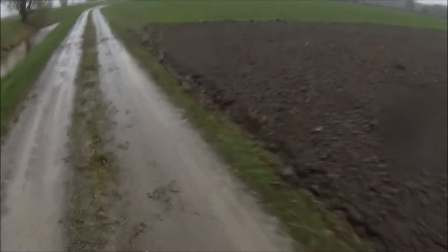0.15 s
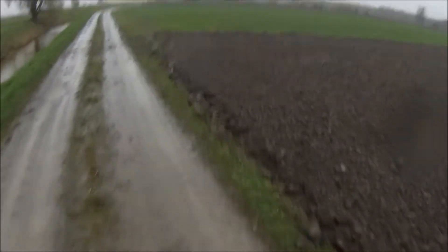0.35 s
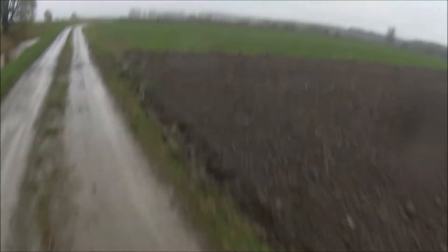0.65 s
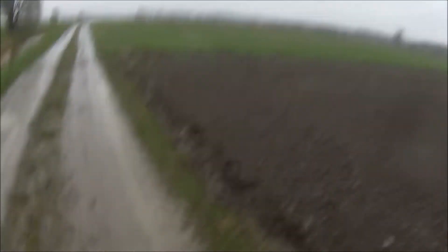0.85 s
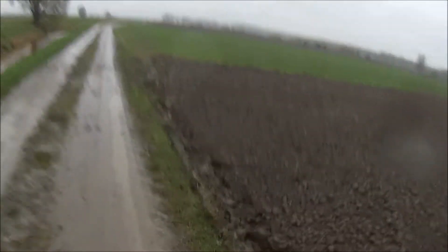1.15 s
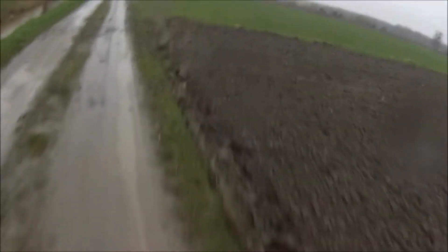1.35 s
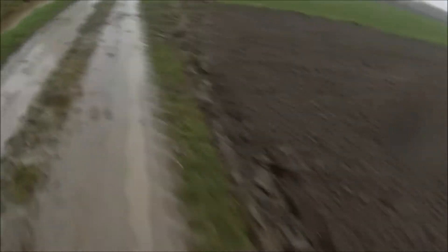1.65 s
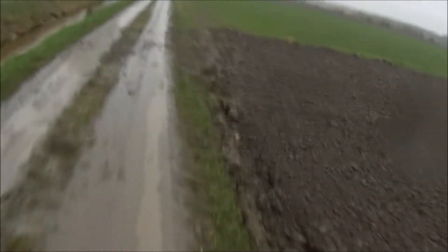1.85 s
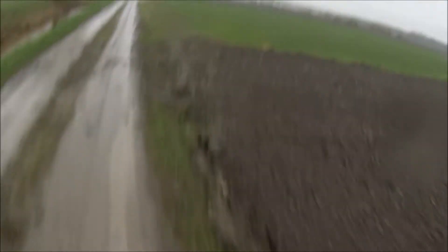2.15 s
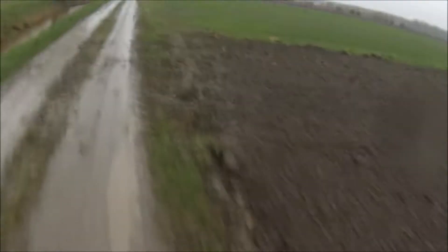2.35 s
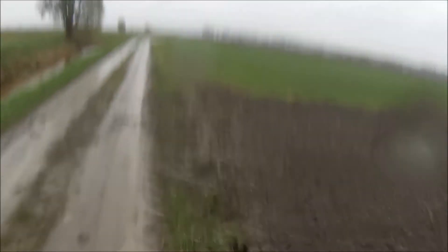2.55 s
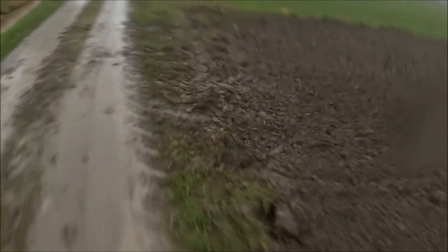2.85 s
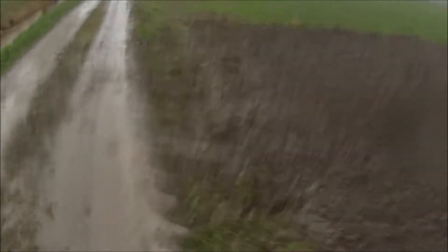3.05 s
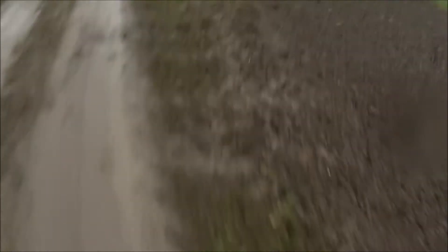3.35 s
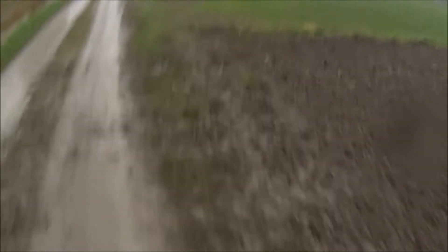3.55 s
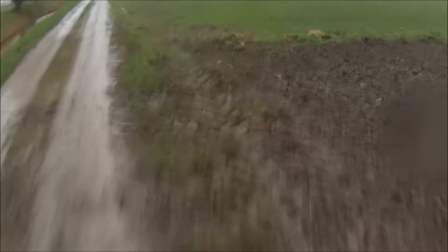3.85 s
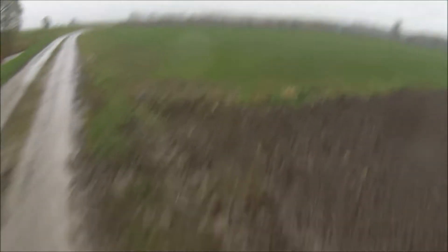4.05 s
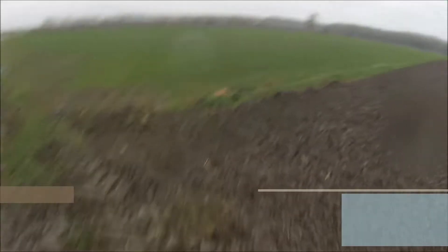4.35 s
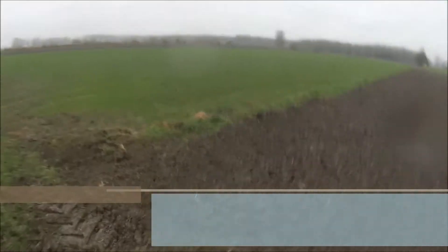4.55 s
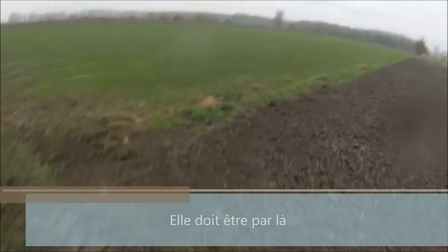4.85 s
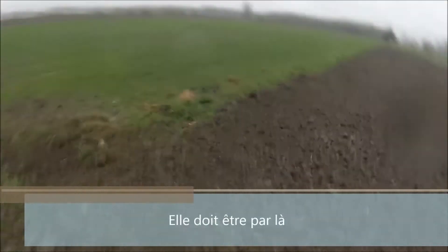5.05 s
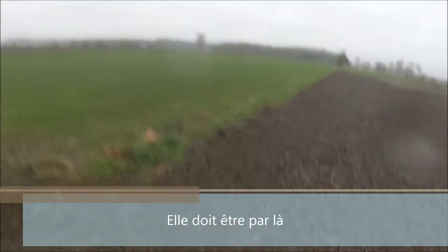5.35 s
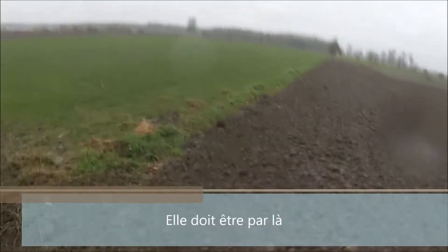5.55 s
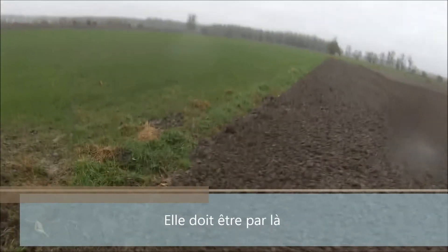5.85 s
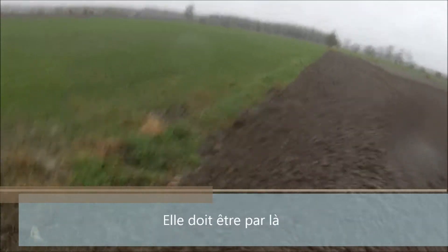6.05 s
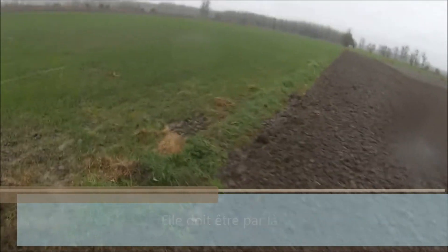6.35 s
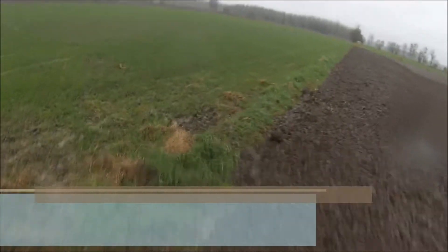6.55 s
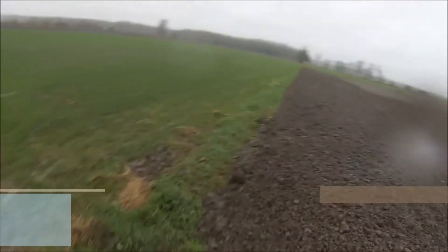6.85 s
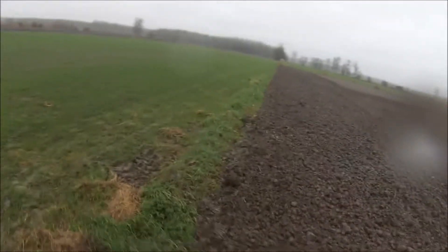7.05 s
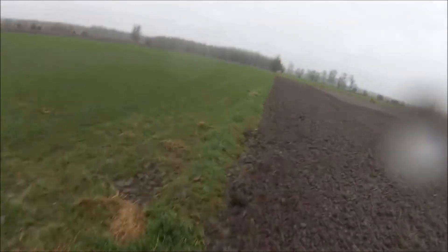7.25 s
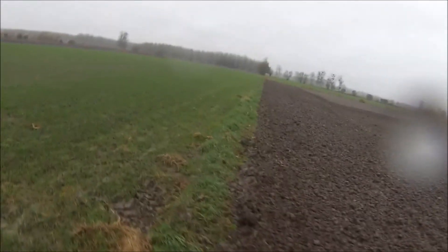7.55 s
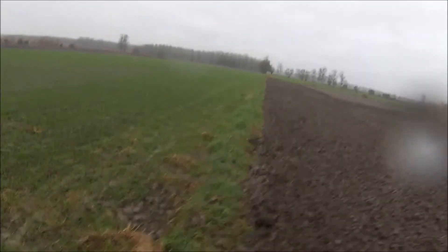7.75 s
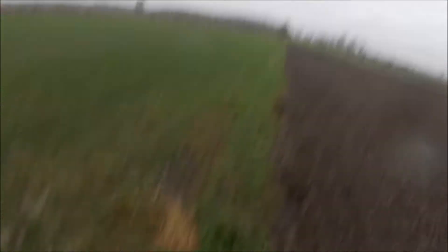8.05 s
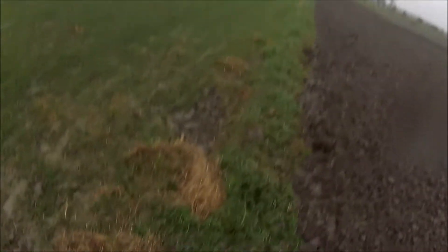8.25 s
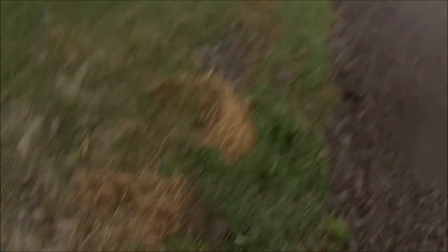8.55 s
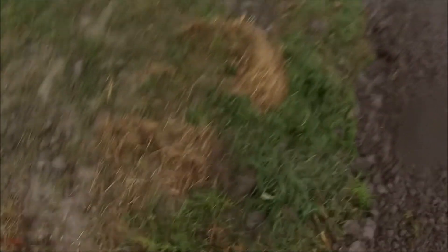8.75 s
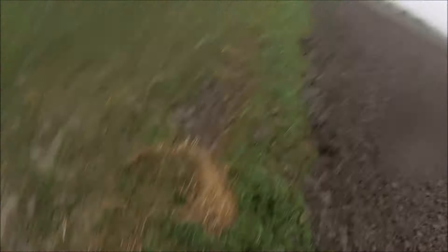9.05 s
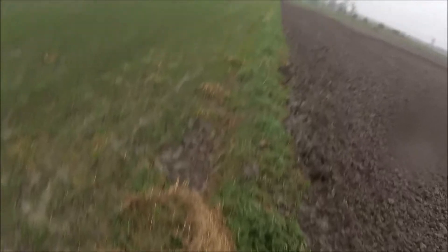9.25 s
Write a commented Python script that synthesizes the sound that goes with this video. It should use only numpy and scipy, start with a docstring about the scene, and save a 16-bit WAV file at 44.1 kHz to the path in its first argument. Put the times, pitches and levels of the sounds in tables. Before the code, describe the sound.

Close raindrops tap on plastic as someone walks through wet mud with deep thuds, then slows and halts.

```python
"""An even hiss of rain on open fields comes first, and at once footsteps on a muddy track, very close.
Each footfall jolts the carried microphone with a deep thud and squirts water; clothing and wet grass swish.
Raindrops tick right on the microphone's plastic housing and make it ring briefly; finer drops patter.
The walker slows down and stops at the edge of a field while the rain goes on."""
import sys
import numpy as np
from scipy import signal
from scipy.fft import rfft, irfft
from scipy.io import wavfile

SR = 44100
rng = np.random.default_rng(int(sys.argv[2]) if len(sys.argv) > 2 else 0)


def to_wav(s):
    """Save 16-bit WAV."""
    ch = np.atleast_2d(s).T  # columns
    pcm = np.round(np.clip(ch, -1, 1) * 32767)  # PCM
    wavfile.write(sys.argv[1], SR, pcm.astype(np.int16))


N = 415422
TIME = np.arange(N) / SR

# Noise colours. Each row: frequency in Hz, relative spectral level in dB.
FAR_RAIN_COLOUR = [(100, 3.5), (250, 5.5), (500, 3), (1000, 0), (2000, -7), (3200, -6.5), (5500, -10),
                   (8000, -14), (12500, -17.5), (15000, -24.5)]  # rain out on the fields
RUB_COLOUR = [(90, 2), (170, 9.5), (320, 7), (600, -1.5), (1000, -19.5), (1600, -26.5)]  # cloth and mud
SWISH_COLOUR = [(700, -8.5), (1200, -6), (1750, -1.5), (2200, 0), (2800, -10), (3600, -31), (5000, -33.5)]  # wet grass and squirting water
SPRAY_COLOUR = [(2600, -18.5), (3500, 3.5), (4400, 1), (5700, -3.5), (7000, -13), (9000, -40)]  # flying droplets
SIZZLE_COLOUR = [(5500, 1), (7200, 12), (9500, 6.5), (12000, -1.5), (15000, -24)]  # a sole on wet ground
SWAY_COLOUR = [(14, 0.5), (24, 5), (48, -5), (70, -11.5), (100, -23), (160, -29)]  # the housing rumbling on its mount
# How hard the walker brushes through the wet. Each row: time in seconds, level in dB.
BRUSHING = [(0.0, -66), (0.15, -67), (1.26, -61.5), (1.6, -66), (1.86, -64.5), (2.17, -60.5), (2.46, -56.5),
            (2.86, -63.5), (3.23, -59.5), (3.88, -61.5), (4.83, -64.5), (4.96, -66), (7.37, -68),
            (7.58, -62.5), (8.42, -71.5), (9.13, -68), (9.42, -69)]
# Sway of the carried housing. Each row: time in seconds, level in dB.
SWAY_LEVELS = [(0, -42.5), (2.0, -47.5), (2.7, -41.5), (3.5, -45.5), (5.4, -47.5), (6.3, -50), (7.4, -52),
               (8.1, -47), (9.42, -52)]
# Steps on the track. Each row: time in seconds, jolt strength in dB, jolt pitch in Hz, wetness in dB.
FOOTSTEPS = [(0.075, -5.5, 32.6, -7.5), (0.452, -15, 22, -2), (0.829, -10, 28.7, -3),
             (1.211, -13.5, 23.8, -5), (1.586, -8, 33.7, -1), (1.944, -13.5, 29.6, -5),
             (2.314, -8.5, 29.5, -2), (2.698, -7.5, 29.4, -5), (3.069, -12, 26.8, -2.5),
             (3.426, -20, 29.5, 1.5), (3.804, -12.5, 30.7, -2.5), (4.197, -8.5, 26.7, -7),
             (4.612, -6, 25.7, -5), (5.034, -9.5, 36, -9), (5.458, -21.5, 29.6, -2),
             (5.988, -13.5, 25.4, -5), (6.512, -24.5, 36, -17), (7.028, -22.5, 35.4, -19),
             (7.714, -29, 23.1, -7), (8.204, -35.5, 26, -8)]
# Full drops on the housing. Each row: time in seconds, strength in dB,
# upper main modes over lower ones in dB, hardness in dB (more gives more treble).
HOUSING_DROPS = [(0.0825, -40.5, -2.5, -15), (0.1745, -45.5, -8, -27), (0.6105, -38.0, -6.5, -19),
                 (0.793, -41, -3.5, -11), (0.8224, -51.5, -3, 2), (1.0243, -31, 3, -4),
                 (1.0674, -44.5, -8, -18), (1.1349, -37, 4, -16.5), (1.289, -43.5, -2, -12),
                 (1.3115, -38.5, -1.5, -9), (1.4091, -37.5, -3.5, -26), (1.461, -34.5, -1.5, -39),
                 (1.7906, -49.5, 13, 3.5), (1.8301, -36, -6.5, -30), (2.024, -44, -4, -12),
                 (2.0835, -44, -0.5, -19), (2.1187, -47.5, -3, -8.5), (2.169, -47.5, -4, -21),
                 (2.3123, -41, -5, -25), (2.4683, -39.5, 10, 7.5), (2.5468, -45.5, -2, -11),
                 (2.558, -40.5, -8, -9), (2.6014, -35.0, -6, -29), (2.7684, -59, 14, 13),
                 (2.8224, -41, 5.5, 3.5), (3.158, -28.0, 2.5, -9), (3.2062, -44.5, -14, -14),
                 (3.248, -46.5, -3, -24), (3.33, -43, 6, -8.5), (3.46, -47.5, -6, -5.5),
                 (3.5103, -41, -12, -13), (3.5387, -34, 2, -3), (3.5879, -32, -2, -23),
                 (3.756, -48, -10, -5), (4.028, -39, -2.5, -1.5), (4.094, -44.5, -10, -6),
                 (4.133, -31.5, -7, -27), (4.1982, -36.5, -6, -25), (4.2397, -52, 3, -2),
                 (4.3439, -49.5, -1, -8), (4.3789, -32, 0, -14.5), (4.482, -32, -2, -33),
                 (4.57, -43.5, -8, -8), (4.579, -41.5, 8, -10), (4.6151, -42, -5, -10.5),
                 (4.8656, -30, -3, -7), (5.4055, -31, 7, -5.5), (5.5716, -47, 1, -14),
                 (5.838, -49.5, 12, -5.5), (5.889, -52, 5, -4), (5.9725, -45, 8, -1.5), (6.1, -48, 16, -5),
                 (6.232, -46, 9, -8.5), (6.2824, -45, -4, -7.5), (6.3155, -22.5, 5.5, -10.5),
                 (6.3778, -22.5, -5, -8.5), (6.4854, -50.5, 4, -20), (6.5822, -33.5, 14, -9),
                 (6.6261, -30.5, 4, -11), (6.778, -27.5, 3.5, -10.5), (6.9701, -27, 1, -1),
                 (7.3014, -42.5, 2, -7.5), (7.3988, -47, -5, -10), (7.4132, -32.5, 4.5, -4),
                 (7.523, -36.5, 8, -5.5), (7.5964, -42.5, -5, -15.5), (7.6666, -28.5, 5.5, -1),
                 (7.7348, -38.5, -4.5, -8), (7.9293, -37.5, -10, -42), (8.0158, -41, -2, -9),
                 (8.0899, -44, 4, -6), (8.117, -45.5, 14, -8), (8.6236, -31.5, 2.5, -8.5),
                 (8.8153, -18.5, 4, -9.5), (9.1475, -41.5, 1, -6), (9.175, -28.0, 8.5, -6.5),
                 (9.218, -50.5, -3, -5), (9.298, -51, -2, -2)]
# The housing's two main and three treble ranges. Each row: low edge in Hz, high edge in Hz.
MODE_RANGES = [(1100, 2050), (2000, 3000), (3000, 4800), (4800, 8000), (8000, 15000)]
# How a hard landing wakes the treble ranges. Each row: offset in dB at hardness 0, dB per dB of hardness.
TREBLE_RESPONSE = [(-2, 1.32), (-2.5, 1.17), (-14.5, 1.15)]
# Modes of the plastic housing. Each row: frequency in Hz, bandwidth in Hz, relative level in dB.
DAMPED_MODES = [(1530, 120, -31), (1693, 444, 19), (2150, 890, 4.5), (2637, 380, 11), (3190, 1150, 0),
                (4290, 2440, -1), (5590, 770, 2), (7370, 1010, -3.5), (9140, 2050, 5.5), (12800, 2000, 3.5),
                (14300, 2100, -3)]
RINGING_MODES = [(1867, 18, -5), (2100, 53, -8.5), (2170, 48, -6), (2970, 47, -6), (3130, 31, -12),
                 (4600, 23, -30), (6200, 64, -13.5)]
# Fine rain at the microphone. Each row: time in seconds, drops per second, typical strength in dB.
FINE_RAIN = [(0, 32, -63.5), (1.2, 34, -62.5), (4.6, 34, -56.5), (5.6, 25.2, -62.5), (8.0, 5.6, -60.5),
             (8.4, 3.3, -64.5), (9.42, 6, -49)]

HEEL_DB, HEEL_GROWTH = -23, 1.63  # heel force at a 0 dB jolt, dB per dB of jolt
SQUIRT_DB, SQUIRT_GROWTH = -41, 0.95  # the same for the squirt, which grows more slowly
CUTOFF_HZ = 16000


def from_db(db):
    """Decibels to gain."""
    return 10 ** (np.asarray(db) / 20)


def rms_one(x):
    """Scale to unit rms."""
    return x / np.sqrt(np.mean(x ** 2) + 1e-20)


def in_time(rows):
    """Each column of a curve at every sample."""
    s, *columns = np.transpose(rows)
    return [np.interp(TIME, s, c) for c in columns]


def add(out, s, sound):
    """Mix a sound in from time s on."""
    i = int(np.clip(round(s * SR), 0, N))
    out[i:i + len(sound)] += sound[:N - i]


def noise(colour):
    """Unit noise of a given colour, falling away beyond its ends."""
    hz, db = np.transpose(colour)
    f = np.maximum(np.fft.rfftfreq(N, 1 / SR), 1)
    ends = np.minimum(f / hz[0], 1) ** 2 * np.minimum(hz[-1] / f, 1) ** 2
    shape = from_db(np.interp(np.log(f), np.log(hz), db))
    return rms_one(irfft(rfft(rng.standard_normal(N)) * ends * shape, N))


def flicker(per_s):
    """Random wandering of spread about 1."""
    return np.interp(TIME * per_s, np.arange(N), rng.standard_normal(N))


def swells(times, widths_s, levels_db):
    """Bell-shaped bursts of gain."""
    out = np.zeros(N)
    for s, width, db in np.broadcast(times, widths_s, levels_db):
        near = slice(*np.searchsorted(TIME, [s - 4 * width, s + 4 * width]))
        out[near] += from_db(db) * np.exp(-.5 * ((TIME[near] - s) / width) ** 2)
    return out


def far_rain(level_db=-64):
    """Far off, rain on the open fields merges into a smooth hiss."""
    return from_db(level_db) * noise(FAR_RAIN_COLOUR)


def brush_and_sway(swish_db=-2.5, spray_db=-14, rub_db=-4, grain_db=3, sway_spread_db=3):
    """Clothing and wet grass rub and swish close by; the housing sways on its mount."""
    brushing_db, = in_time(BRUSHING)
    sway_db, = in_time(SWAY_LEVELS)
    swish = from_db(swish_db) * noise(SWISH_COLOUR) + from_db(spray_db) * noise(SPRAY_COLOUR)
    swish *= from_db(grain_db * flicker(140))  # wet fabric and stalks catch and slip
    rub = from_db(rub_db) * noise(RUB_COLOUR)
    sway = from_db(sway_db + sway_spread_db * flicker(8)) * noise(SWAY_COLOUR)
    return from_db(brushing_db) * (swish + rub) + sway


def swing(t, hz, width_cycles=0.36, phase=-0.59):
    """One slow swing of the microphone: a sine under a short bell."""
    return np.exp(-.5 * (t * hz / width_cycles) ** 2) * np.sin(2 * np.pi * hz * t + phase)


def footfalls(jolt_db=-1, toe_db=-21, toe_before_s=0.0874, knock_hz=85, knock_s=0.007, knock_db=3,
              shudder_hz=42, shudder_s=0.025, shudder_db=-8, play_limit_db=-29, settle_s=0.0195):
    """Thuds through the mount: the rear foot pushes off, the heel lands with a knock, the mount shudders."""
    out = np.zeros(N)
    for (s, db, hz, _), (detune, phase) in zip(FOOTSTEPS, rng.uniform(-0.85, 1, (len(FOOTSTEPS), 2))):
        start = max(s - .2, 0)
        t = np.arange(SR // 2) / SR + start - s
        toe = from_db(db + toe_db) * swing(t + toe_before_s, hz)
        jolt = from_db(db + jolt_db) * swing(t, hz)
        knock_gain = from_db(HEEL_DB + HEEL_GROWTH * db + knock_db)
        knock = -knock_gain * np.exp(-np.abs(t) / knock_s) * np.cos(2 * np.pi * knock_hz * t)
        # two modes of the mount beat as they die away, limited by its play
        age = np.maximum(t - settle_s, 0) / shudder_s
        angle = 2 * np.pi * shudder_hz * (1 + 0.21 * detune) * t
        beating = np.sin(angle + np.pi * phase) + 0.64 * np.sin(0.607 * angle)
        shudder = from_db(min(db + shudder_db, play_limit_db)) * age * np.exp(1 - age) * beating
        add(out, start, toe + jolt + knock + shudder)
    return out


def squelch(crush_db=-15, crush_s=0.014, squirt_s=0.017, spray_db=-9, spray_s=.018, sizzle_s=0.014,
            touch_db=-11, touch_before_s=0.019, roll_db=-16, roll_after_s=.03):
    """Underfoot the sole sizzles on the wet, the heel crushes mud and squirts water, the foot rolls down."""
    at, jolt_db, _, wet_db = np.transpose(FOOTSTEPS)
    mud = swells(at, crush_s, HEEL_DB + HEEL_GROWTH * jolt_db + crush_db) * noise(RUB_COLOUR)
    water_db = SQUIRT_DB + SQUIRT_GROWTH * jolt_db + wet_db
    grains = rms_one(from_db(6 * np.minimum(flicker(600), 2)))
    touch = swells(at - touch_before_s, sizzle_s, water_db + touch_db)
    roll = swells(at + roll_after_s, sizzle_s, water_db + roll_db)
    spray = swells(at, spray_s, water_db + spray_db) * noise(SPRAY_COLOUR)
    sizzle = (touch + roll) * noise(SIZZLE_COLOUR)
    squirt = swells(at, squirt_s, water_db) * noise(SWISH_COLOUR)
    return mud + (squirt + spray + sizzle) * grains


def grit(brush_rate=30, step_rate=130, step_s=.035, level_db=4, spread_db=5.5, crack_s=0.00043, size=256):
    """Wet grit and stalks give tiny bright cracks, more with harder brushing, most under a landing sole."""
    brushing_db, = in_time(BRUSHING)
    at, _, _, wet_db = np.transpose(FOOTSTEPS)
    per_s = brush_rate * from_db(brushing_db - brushing_db.max()) + step_rate * swells(at, step_s, wet_db)
    onsets = rng.random(N) < per_s / SR
    cracks = onsets * from_db(brushing_db + level_db + spread_db * np.minimum(rng.standard_normal(N), 2))
    decay = np.exp(-np.arange(size) / SR / crack_s)
    return np.convolve(cracks, decay)[:N] * (noise(SPRAY_COLOUR) + noise(SIZZLE_COLOUR))


def resonate(x, modes):
    """Parallel resonances of alternating sign."""
    out = 0
    for k, (hz, width, db) in enumerate(modes):
        r = np.exp(-np.pi * width / SR)
        ringing = signal.lfilter([1, 0, -1], [1, -2 * r * np.cos(2 * np.pi * hz / SR), r * r], x)
        out = out + (-1) ** k * from_db(db) * (1 - r * r) / 2 * ringing
    return out


def band_at(pulses, edges_hz, db):
    """One band of each pulse, with the energy of 10 ms at the given level."""
    band = signal.sosfilt(signal.butter(1, edges_hz, "band", fs=SR, output="sos"), pulses)
    return band * (from_db(db) * np.sqrt(.01 * SR / np.sum(band ** 2, axis=1)))[:, None]


def range_levels(level_db, upper_db, hard_db):
    """Where a drop lands shares its energy between the two main ranges; a hard landing adds treble."""
    lower_db = level_db - 10 * np.log10(1 + from_db(upper_db) ** 2)
    treble_db = [level_db + db + growth * hard_db for db, growth in TREBLE_RESPONSE]
    return np.transpose([lower_db, lower_db + upper_db] + treble_db)


def housing_ticks(levels_db, splash_s=0.0015, splash_db=-15, spray_s=0.0079, spray_db=-42, size=3072,
                  push_db=-21, push_hz=800, ring_db=-4, ring_spread_db=3, mode_spread_db=1.44):
    """Drops strike the plastic, one tick per row of range levels, each with its own blend of modes."""
    t = np.arange(size) / SR
    count = len(levels_db)
    # the drop collapses and leaves a faint spray of droplets
    collapse = from_db(splash_db) * np.exp(-t / splash_s) + from_db(spray_db) * np.exp(-t / spray_s)
    force = rng.standard_normal((count, size)) * collapse
    force[:, 0] += 1  # the impact
    shell = 0
    for (low_hz, high_hz), db in zip(MODE_RANGES, levels_db.T):
        modes = [mode for mode in DAMPED_MODES if low_hz < mode[0] <= high_hz]
        struck = 0
        for k, mode in enumerate(modes):
            gain = from_db(mode_spread_db * rng.standard_normal((count, 1)))
            struck += (-1) ** k * gain * resonate(force, [mode])
        shell += band_at(struck, [low_hz, high_hz], db)
    # below its modes the wall gives way for an instant under the weight of the drop
    weight = np.exp(-2 * np.pi * push_hz * t)[None]
    push = band_at(weight, [110, push_hz], levels_db.max(axis=1) + push_db)
    # hard, bright landings ring up to 10 dB more than soft ones
    brightness_db = levels_db[:, 2] - levels_db[:, :2].max(axis=1)
    hardness = from_db(np.clip(brightness_db + 13, -10, 0))[:, None]
    blend = from_db(ring_spread_db * rng.standard_normal((count, len(RINGING_MODES))))
    ring = hardness * sum(blend[:, [k]] * resonate(shell, [mode]) for k, mode in enumerate(RINGING_MODES))
    return push + shell + from_db(ring_db) * ring


def big_drops(gain_db=-.5, lead_s=.0003, burst_db=-29, burst_after_s=.017, burst_s=0.0049):
    """Full drops hit right at the microphone; hard ones burst and their spray falls back a moment later."""
    out = np.zeros(N)
    at, level_db, upper_db, hard_db = np.transpose(HOUSING_DROPS)
    for s, tick in zip(at, housing_ticks(range_levels(level_db + gain_db, upper_db, hard_db))):
        add(out, s - lead_s, tick)
    bursts = swells(at + burst_after_s, burst_s, level_db + hard_db + burst_db)
    return out + bursts * (noise(SWISH_COLOUR) + noise(SPRAY_COLOUR))


def patter(gain_db=1, upper_db=-3, hard_db=-13, spread_db=3, candidates=340):
    """Fine drops land softly on the housing at random, more of them while walking into the rain."""
    per_s, typical_db = in_time(FINE_RAIN)
    when, chance = rng.random((2, candidates))
    at = (when * N).astype(int)
    lands = chance < per_s[at] * N / SR / candidates
    strength, place, hardness = spread_db * rng.standard_normal((3, candidates))
    levels_db = range_levels(typical_db[at] + gain_db + strength, upper_db + place, hard_db + hardness)
    out = np.zeros(N)
    for i, tick in zip(at[lands], housing_ticks(levels_db)[lands]):
        add(out, i / SR, tick)
    return out


def scene():
    """One carried microphone in open air, no echo: drops on it, the walker close, the fields beyond."""
    on_housing = big_drops() + patter()
    walker = footfalls() + squelch() + grit() + brush_and_sway()
    return (on_housing + walker + far_rain())[None]


def record(dry):
    """The recorder cuts the highest treble steeply."""
    return signal.sosfilt(signal.ellip(10, .1, 80, CUTOFF_HZ, fs=SR, output="sos"), dry)


dry = scene()
out = record(dry)
to_wav(out)
```